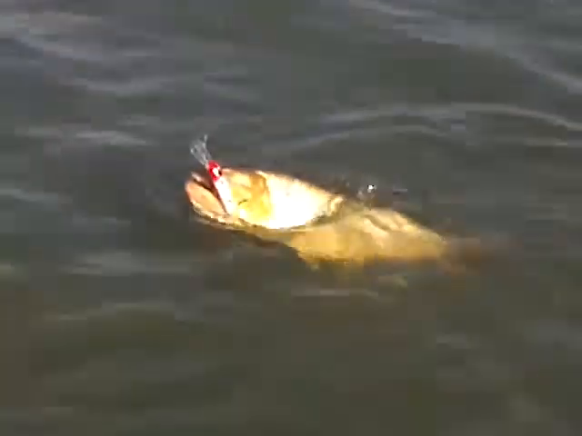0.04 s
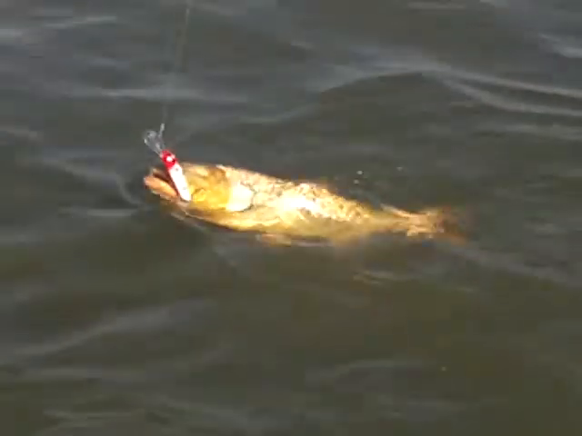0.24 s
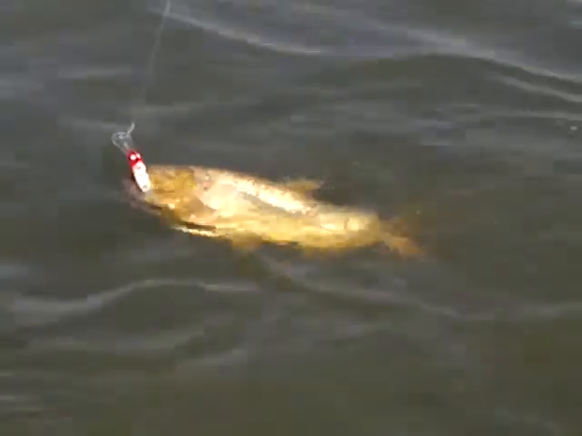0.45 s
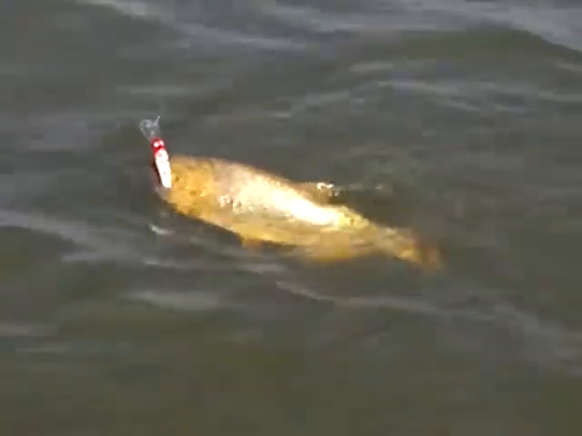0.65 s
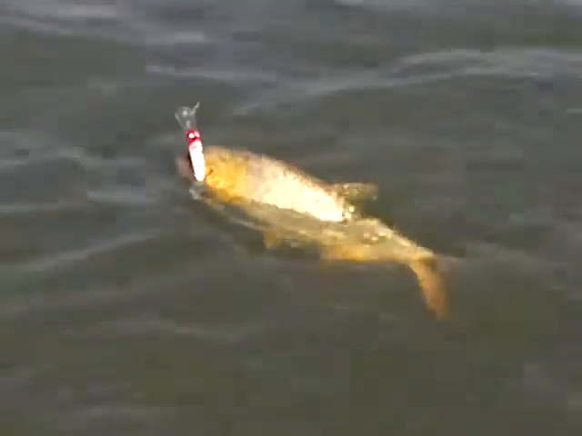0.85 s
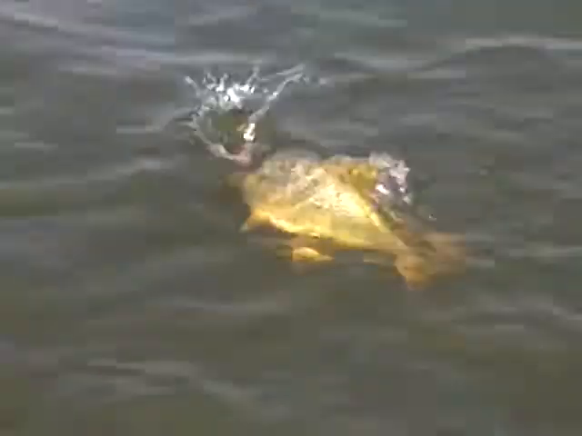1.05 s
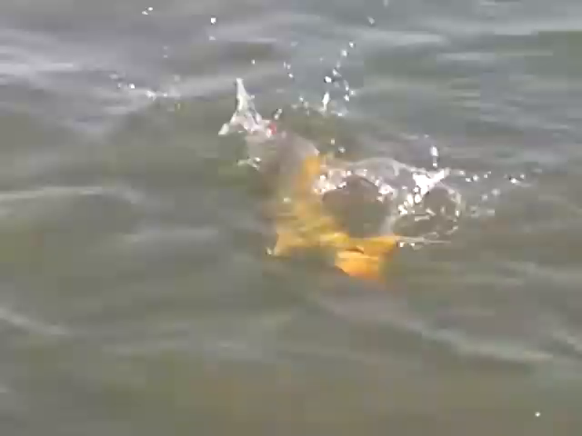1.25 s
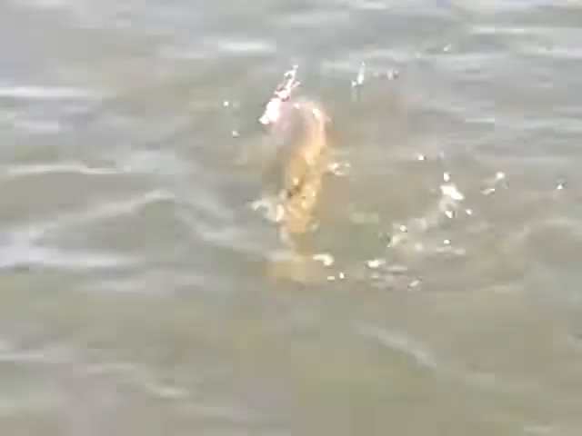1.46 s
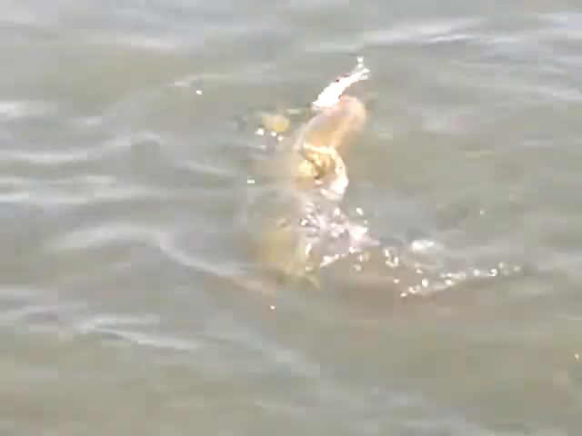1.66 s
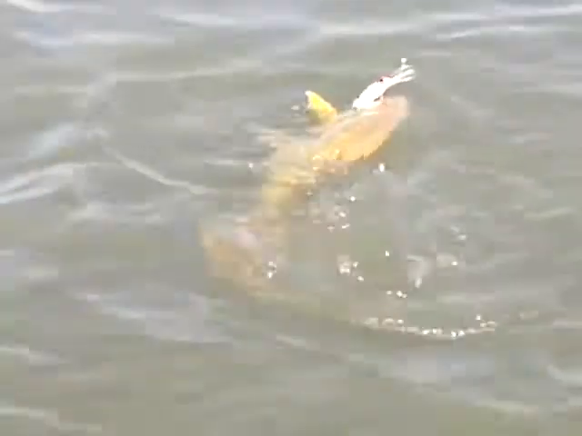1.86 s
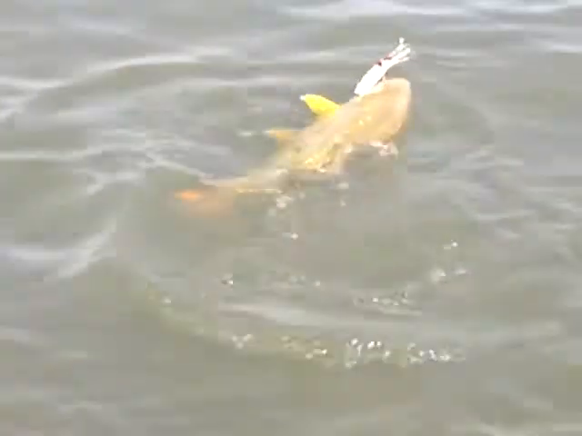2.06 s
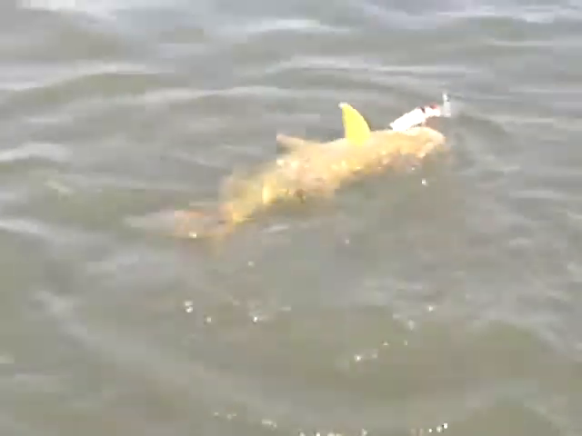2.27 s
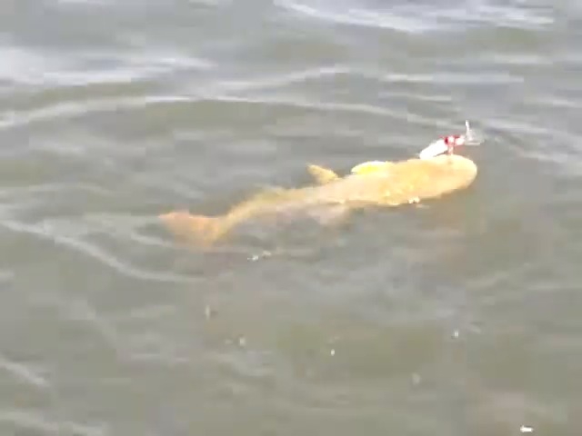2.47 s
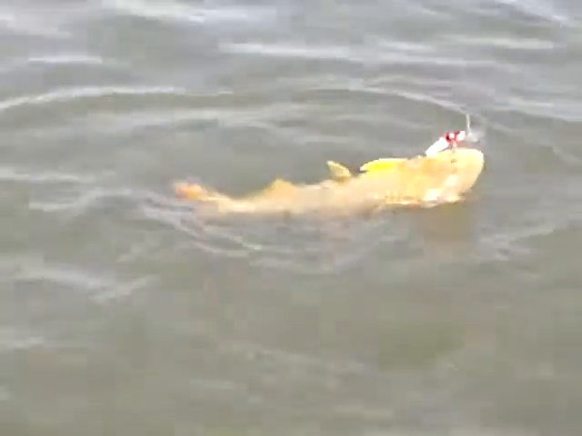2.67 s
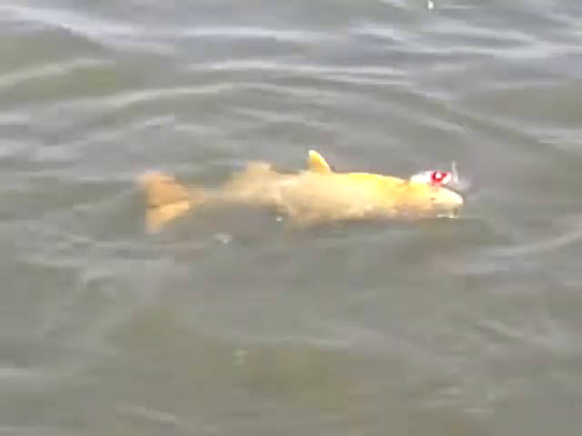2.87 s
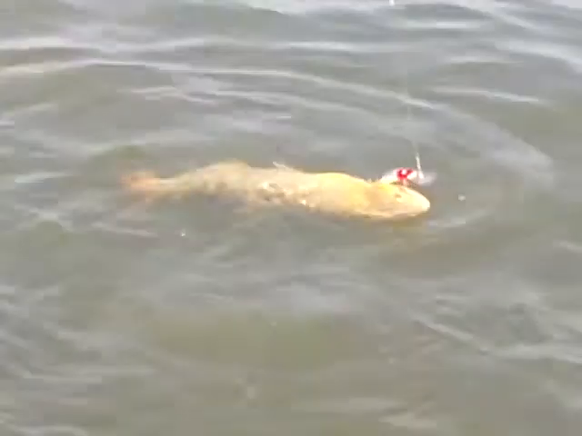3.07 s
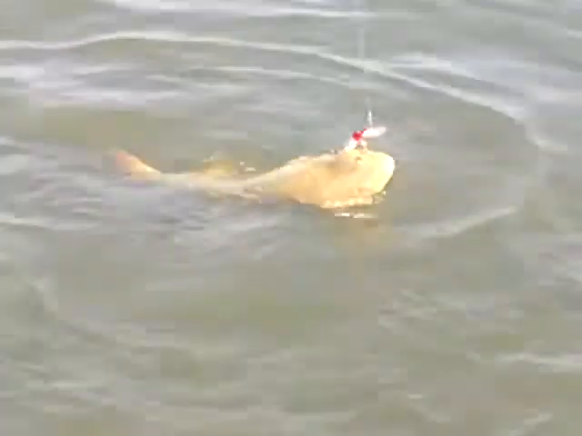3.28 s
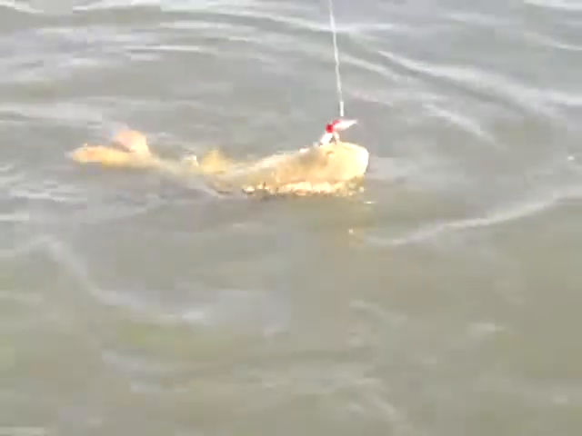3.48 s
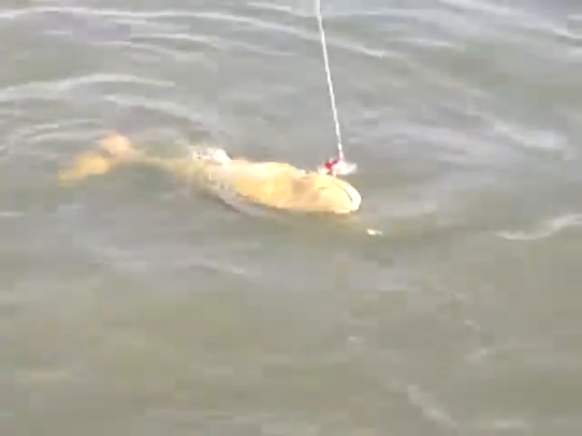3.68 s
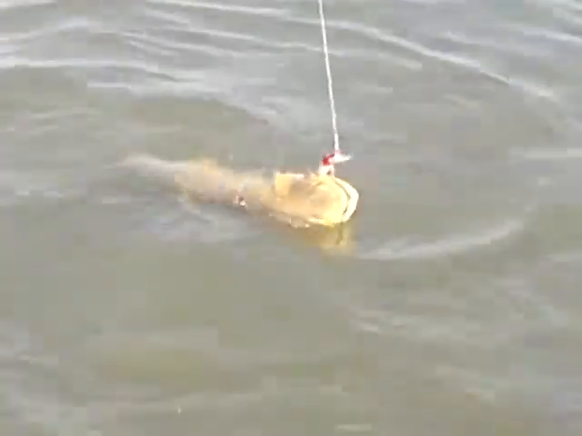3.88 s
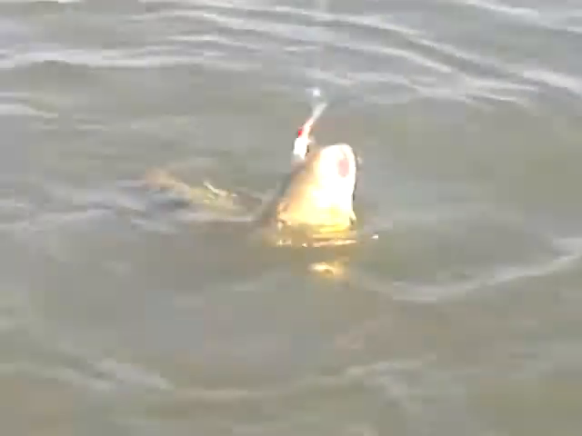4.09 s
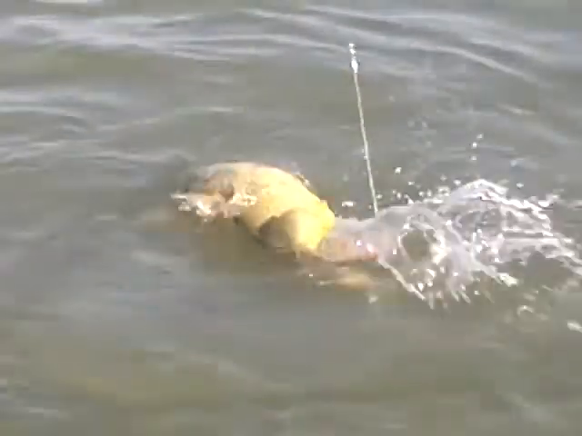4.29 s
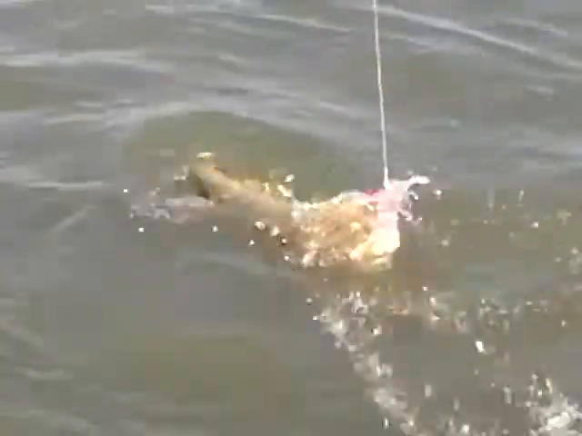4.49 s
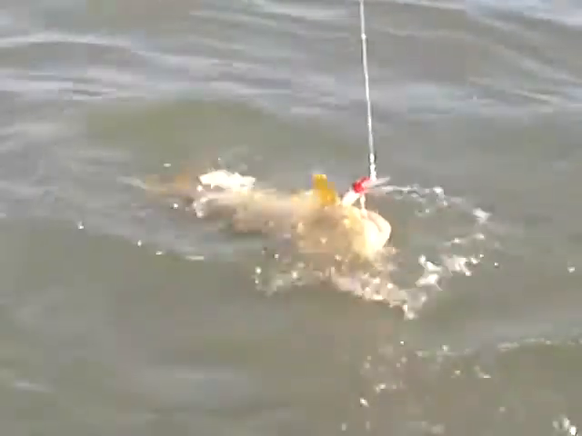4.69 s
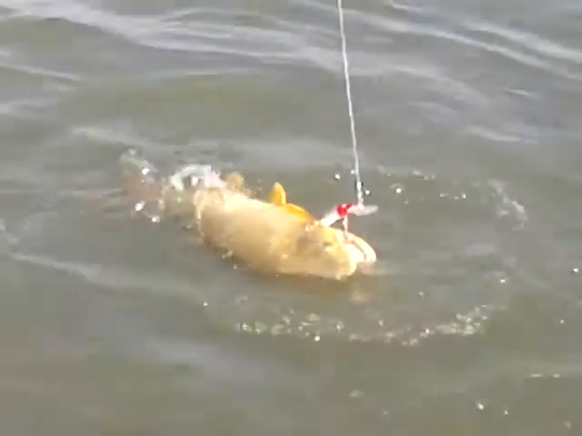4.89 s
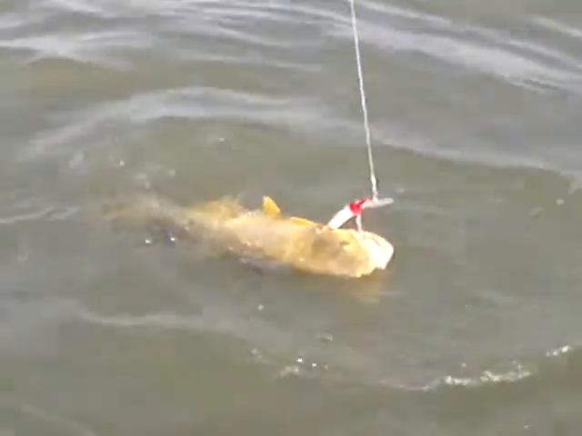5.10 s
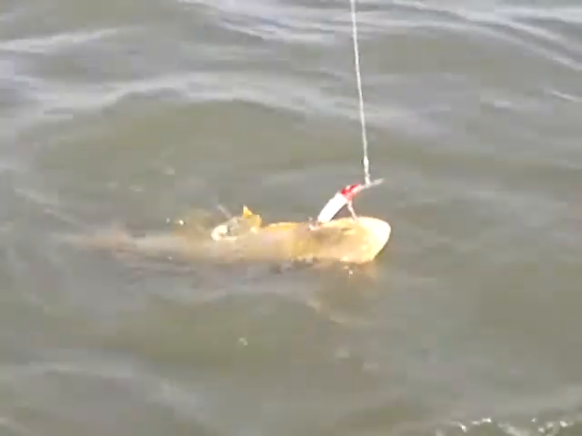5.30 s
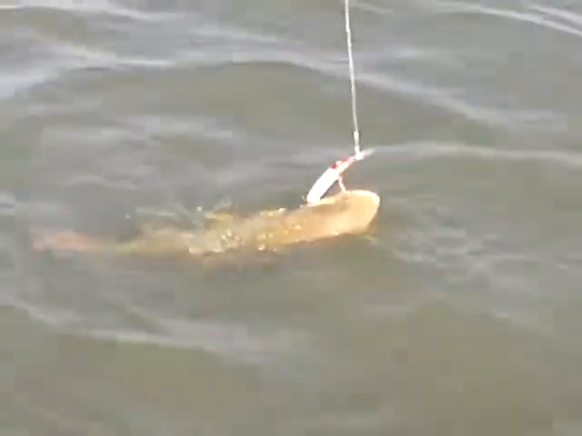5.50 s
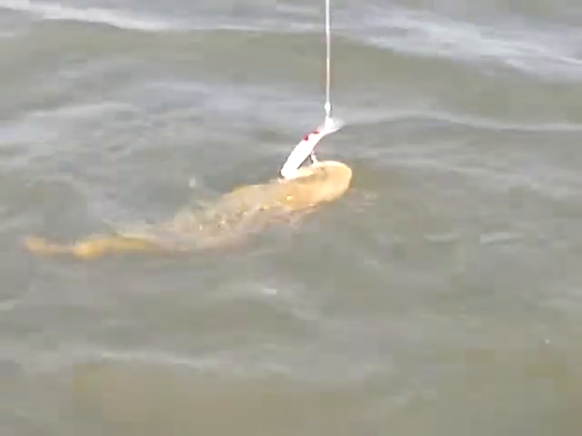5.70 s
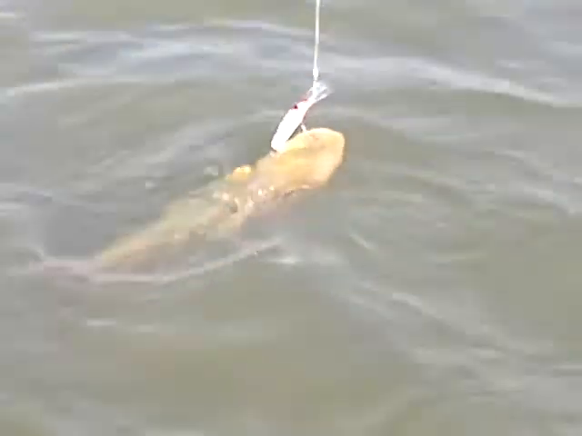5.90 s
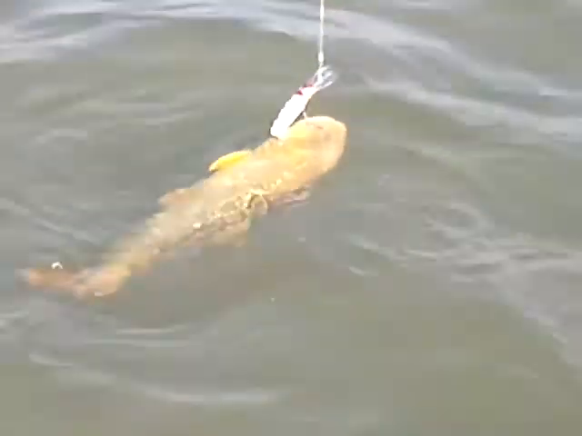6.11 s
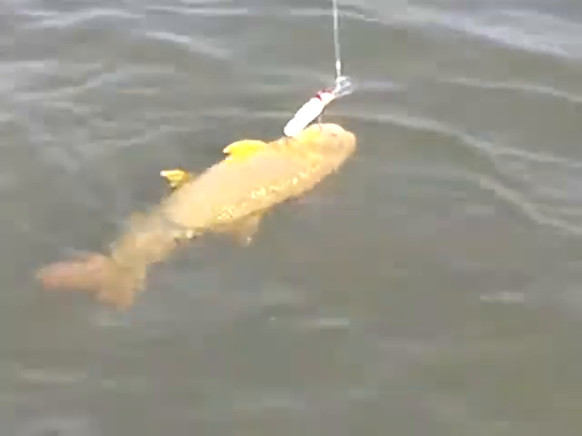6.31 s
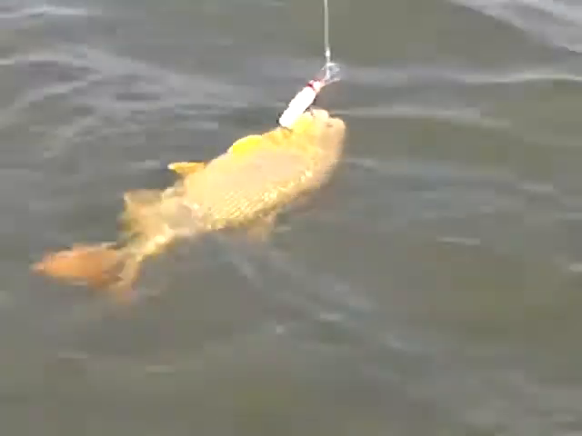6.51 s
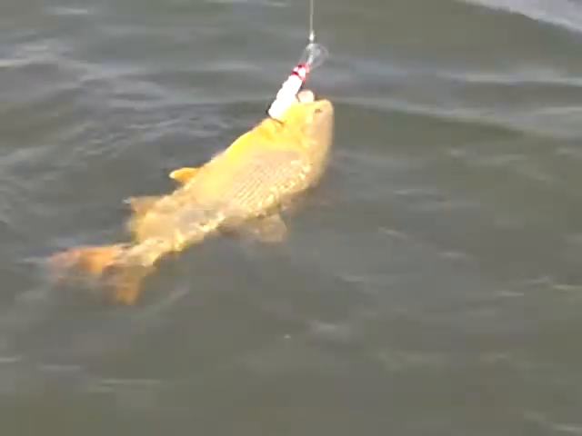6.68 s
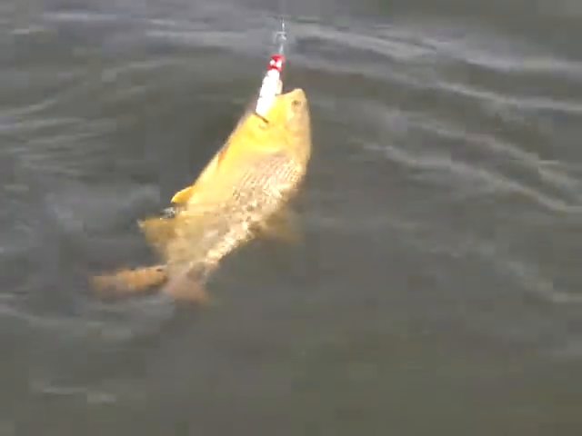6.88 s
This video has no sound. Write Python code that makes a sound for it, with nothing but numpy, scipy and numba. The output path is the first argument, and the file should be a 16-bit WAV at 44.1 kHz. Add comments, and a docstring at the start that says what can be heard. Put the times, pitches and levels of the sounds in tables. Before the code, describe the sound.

Outdoors on open water, close wind pounds the right side of a stereo microphone with deep, fluttering thumps; the left is sheltered. Under it lies a faint steady boat hum. Small drips come first, then a fish thrashes in a splash after one second. Sparse plops and gulps follow, then a harder wet flurry from four to five seconds, low gurgles, and two dull knocks on the camera near six.

```python
"""A hooked fish thrashes at the surface beside a small boat on a windy day, over steady hull hum and rumble.
From the start gusts pound the right microphone port, as band-passed noise and bell-shaped swings, rasp in its
capsule and brush the sheltered left one. Drops fall, then near 1 s water bursts up: shaped noise with dying
sines for bubbles. Sparser drops, gulps and lapping follow, a harder burst of spray and slaps fills 4 to 5 s,
then water gurgles low and near 6 s the camera body is knocked twice: pressure pulses with a short shell ring."""
import sys
import numpy as np
from scipy import signal
from scipy.fft import rfft, irfft, next_fast_len
from scipy.io import wavfile
from scipy.ndimage import uniform_filter1d
from numba import njit

SR = 44100
rng = np.random.default_rng(int(sys.argv[2]) if len(sys.argv) > 2 else 0)


def put_to_file(sound):
    """Save the sound as 16-bit audio at rate SR, in the file named by the first command-line argument."""
    columns = np.atleast_2d(sound).T  # one column per channel
    safe = np.clip(columns, -1, 1)
    whole_steps = np.round(safe * 32767)
    wavfile.write(sys.argv[1], SR, whole_steps.astype(np.int16))


N = 306406
PADDED = next_fast_len(N + 4096)   # transform length, samples
HZ = np.maximum(np.fft.rfftfreq(PADDED, 1 / SR), 1)


def splash():
    """Superposed impacts and bubble resonances: droplets make slosh, spray and mist, trapped air the churn."""
    # spectra of sloshing water, spray and fine mist: f/Hz, relative level/dB
    slosh_spectrum = [(700, -15.5), (1100, -8.5), (1450, 4.5), (1750, 6), (2000, 10.5), (2300, 6),
                      (2700, -3), (3200, -10), (4000, -28)]
    spray_spectrum = [(1600, -13), (2500, 5.5), (3100, 5), (3800, 5), (4800, 3.5), (7000, -19.5)]
    mist_spectrum = [(3200, -12.5), (4800, 9), (5800, 8), (7500, 8), (10500, 7.5), (13000, 3.5),
                     (16000, -3)]
    trickle_db, trickle_per_s = -86, 31   # stray droplets and lapping at the hull
    sloshing, spraying, misting, churning = sheets_and_lapping()

    droplets = rms_one(clicks(1500 * from_db(6.5 * drift(60)), spread_db=3.0))
    impacts = droplets + 0.6 * rng.standard_normal(N)
    low_bubbles = bubbles(1700, 1100, 3400, cycles=17.0, spread_db=3.5)
    high_bubbles = bubbles(1800, 2200, 5500, cycles=4.4, spread_db=7.0)
    slosh = patchy(impacts + 0.36 * low_bubbles, slosh_spectrum, patchy_db=3.0, rate=22)
    spray = patchy(impacts + 0.11 * high_bubbles, spray_spectrum, patchy_db=3.0, rate=30)
    mist = patchy(impacts, mist_spectrum, patchy_db=3.0, rate=45)
    churn = bubbles(400, 472, 1244, cycles=21.0, spread_db=2.0)
    trickle = bubbles(trickle_per_s, 1500, 12000, cycles=6.9, spread_db=2.0)

    # so many grains overlap that no single one stands far out
    slosh, spray, churn = (evened(layer, 0.014, share=0.16) for layer in (slosh, spray, churn))
    water = sloshing * slosh + spraying * spray + misting * mist
    return water + churning * churn + plips(sloshing) + from_db(trickle_db) * trickle


def sheets_and_lapping():
    """Exponential decay in two stages: each sheet or swell rises, dies and dribbles away over calm water."""
    # sheets of water thrown up, and small swells of lapping: t/s, hold/s, then slosh, spray, mist and
    # churn level/dB
    water_rows = [(0.407, 0.026, -60, -95, -72, -58), (0.946, 0.019, -51, -65, -93, -60),
                  (0.969, 0.02, -60, -56, -67, -62), (0.995, 0.033, -50, -49.5, -55, -54.5),
                  (1.037, 0.023, -43, -45.5, -61, -56), (1.096, 0.027, -50, -94, -73, -46),
                  (1.132, 0.021, -52, -82, -92, -59), (1.21, 0.055, -60, -72, -63, -57),
                  (1.263, 0.017, -36.5, -69, -57, -44), (1.283, 0.048, -48.5, -52, -55.5, -51),
                  (1.34, 0.116, -47.5, -62, -58, -55.5), (1.425, 0.01, -43, -62, -80, -50),
                  (1.46, 0.018, -44, -49, -58, -57.5), (1.489, 0.072, -53, -96, -98, -56),
                  (1.581, 0.05, -53.5, -98, -70.5, -55), (1.713, 0.0069, -57, -72, -72, -57),
                  (1.654, 0.055, -61, -92, -76, -56), (1.759, 0.05, -65, -78, -72.5, -52),
                  (2.029, 0.067, -54, -82, -70, -69), (2.384, 0.044, -60, -78.5, -78.5, -55),
                  (2.853, 0.06, -80, -78.5, -80, -61.5), (3.102, 0.0057, -54, -64, -69, -51),
                  (3.103, 0.017, -55, -53, -66.5, -47), (3.124, 0.015, -50.5, -53, -73, -45),
                  (3.017, 0.092, -71, -72, -80.5, -80), (3.272, 0.014, -71.5, -71.5, -82.5, -65),
                  (3.483, 0.041, -75, -102, -94, -61), (3.663, 0.035, -65, -97, -93.5, -58),
                  (4.009, 0.016, -63.5, -54, -55, -77), (4.073, 0.012, -60, -50, -54, -62),
                  (4.091, 0.02, -58, -40.5, -58, -67), (4.118, 0.0065, -53, -54, -55, -53),
                  (4.132, 0.018, -53, -48, -54, -60), (4.157, 0.044, -51, -43, -45, -43),
                  (4.2, 0.057, -45, -49.5, -67, -44), (4.262, 0.012, -44.5, -54, -60, -61),
                  (4.283, 0.043, -46.5, -51, -58.5, -50.5), (4.318, 0.079, -56, -52.5, -62, -75),
                  (4.396, 0.026, -57, -68, -57, -63), (4.419, 0.062, -54, -55.5, -55.5, -58),
                  (4.461, 0.026, -43.5, -55.5, -49, -75), (4.505, 0.026, -54, -53, -56.5, -58.5),
                  (4.54, 0.033, -50.5, -55, -63, -53.5), (4.582, 0.017, -53.5, -49, -53, -45.5),
                  (4.609, 0.032, -48, -44.5, -53, -58), (4.659, 0.048, -50.5, -74, -70, -65.5),
                  (4.72, 0.015, -48.5, -60, -74, -61.5), (4.766, 0.11, -59, -92, -76.5, -55.5),
                  (4.888, 0.048, -58.5, -78, -69, -59.5), (5.339, 0.086, -80, -79.5, -85, -57.5),
                  (5.75, 0.013, -78.5, -68, -85.5, -73), (6.347, 0.024, -75.5, -88.5, -86, -64.5),
                  (6.656, 0.014, -70, -80, -75, -67), (6.895, 0.015, -80, -80, -91, -80)]
    rise_db_per_s = 3199.5
    # first decay of slosh, spray, mist, churn: rate/(dB/s)
    falls_db_per_s = [600, 895, 786, 413]
    # water running back, same order: level against the sheet or swell/dB; decay rate/(dB/s)
    dribbles_db = [-25.5, -35, -19.5, -31]
    dribbles_db_per_s = [70, 90, 60, 60]
    # calm water, same order: level/dB
    calms_db = [-95.5, -96, -88.5, -70.5]

    s, hold, *levels = np.transpose(water_rows)
    settings = zip(levels, falls_db_per_s, dribbles_db, dribbles_db_per_s, calms_db)
    gains = []
    for level_db, fall, dribble_db, slow_fall, calm_db in settings:
        strike = swells(s, hold, level_db, rise_db_per_s, fall)
        dribble = swells(s + hold, 0 * s, level_db + dribble_db, rise_db_per_s, slow_fall)
        gains.append(strike + dribble + from_db(calm_db))
    return gains


def bubbles(per_s, low_hz, high_hz, cycles, spread_db):
    """Bubble resonance in a swarm: each impulse rings one of 14 pitches, down 60 dB in the given cycles; rms 1."""
    born = clicks(per_s, spread_db)
    dealt = rng.integers(0, 14, N)
    pitches = np.geomspace(low_hz, high_hz, 14)
    return rms_one(sum(ring(born * (dealt == k), hz, cycles / hz) for k, hz in enumerate(pitches)))


def plips(sloshing):
    """Resonance of small separate bubbles with climbing pitch; their strength follows the slosh at birth."""
    per_s, spread_db = 220, 3.5
    low_hz, high_hz, mean_cycles, most_climb = 972, 2500, 12, 0.2
    out = np.zeros(N)
    for when, pitch, size, length in rng.random((int(per_s * N / SR), 4)):
        hz = low_hz * (high_hz / low_hz) ** pitch
        gain = sloshing[int(when * N)] * from_db(-spread_db * np.log(size + 0.033))
        cycles = mean_cycles * (.5 + length)
        plip = bubble(hz, cycles, most_climb * length, onset=2.3, length_s=.03)
        add(out, when * N / SR, gain * plip)
    return out


def slaps():
    """Impact and damped cavity resonance: a broad crack centred on the pitch of a ring of only a few cycles."""
    # flat slaps of tail and flung water: t/s, level/dB before the band-pass, f/Hz
    slap_rows = [(1.06, -31, 4050), (1.1485, -37, 1850), (1.3148, -30, 3600), (1.3363, -34, 3000),
                 (1.3827, -34, 4500), (1.3982, -33, 2700), (1.4093, -35, 4500), (1.4294, -31, 1850),
                 (1.44, -35, 3400), (1.4553, -35, 4500), (1.5175, -42, 2600), (1.4632, -20, 2200),
                 (1.4722, -31, 4300), (1.4795, -34, 3550), (3.0969, -36, 2200), (4.0713, -38, 3600),
                 (4.0934, -21, 3200), (4.1253, -33, 4200), (4.1575, -26, 3600), (4.1726, -27, 2500),
                 (4.1838, -21, 3400), (4.2628, -24, 1750), (4.2792, -28, 2200), (4.3086, -35, 4800),
                 (4.327, -35, 5500), (4.3488, -32, 2400), (4.3762, -35, 4200), (4.4682, -25, 2300),
                 (4.4988, -32, 2800), (4.5046, -32, 3500), (4.5851, -30, 2000), (4.5915, -32, 2200),
                 (4.603, -33, 4100), (4.616, -35, 6500), (4.6393, -30, 3300), (4.7153, -37, 3600),
                 (4.9105, -38, 1500)]
    ring_cycles = 9.0   # to fall 60 dB
    crack_db, crack_ms = -1, 1.0   # against the ring; decay constant
    reach = 1.9   # a slap spans this factor either side of its pitch
    out, t = np.zeros(N), np.arange(400) / SR
    for (s, level_db, hz), grain in zip(slap_rows, rng.standard_normal((len(slap_rows), 400))):
        band = signal.butter(2, [hz / reach, hz * reach], "band", fs=SR, output="sos")
        crack = grain * np.exp(-t * 1000 / crack_ms)
        cavity = np.sin(2 * np.pi * hz * t) * from_db(-60 * hz * t / ring_cycles)
        add(out, s, from_db(level_db) * signal.sosfilt(band, cavity + from_db(crack_db) * crack))
    return out


def drops_and_gulps():
    """Impact and damped resonance: a drop cracks and leaves a ringing bubble; gulps and gurgles only ring."""
    # single drops: t/s, level/dB at full onset before decay, f/Hz
    drop_rows = [(0.105, -50, 2580), (0.209, -53, 2500), (0.359, -51, 2350), (0.415, -43, 1940),
                 (0.4474, -41, 1520), (0.563, -52.5, 1580), (0.733, -50.5, 2680), (0.946, -42, 1500),
                 (0.976, -35, 3600), (0.9783, -38, 1840), (0.989, -41.5, 930), (0.993, -39, 2020),
                 (1.004, -39, 1850), (1.0425, -31, 1800), (1.163, -41, 1900), (1.184, -49, 2800),
                 (0.991, -34, 3000), (1.013, -31, 3420), (1.033, -44, 1740), (1.047, -22, 2650),
                 (1.097, -33.5, 2160), (1.1393, -36, 1850), (1.235, -52, 1830), (1.263, -20, 2320),
                 (1.2684, -24, 1780), (1.273, -24, 1690), (1.281, -39, 1750), (1.3188, -27.5, 1860),
                 (1.342, -29, 2000), (1.424, -39, 1610), (1.4431, -31, 1850), (1.492, -45, 2120),
                 (1.521, -43.5, 1204), (1.543, -56, 2410), (1.559, -55, 2450), (1.585, -45, 2070),
                 (1.601, -37, 1870), (1.597, -34.5, 1500), (1.667, -40, 1840), (1.716, -40, 1900),
                 (1.756, -55, 3100), (1.783, -44, 1030), (1.814, -47, 1040), (1.821, -58, 1980),
                 (1.908, -43.5, 2780), (2.038, -45.5, 1890), (2.387, -41.5, 2570), (2.6904, -48, 2470),
                 (3.234, -62, 3000), (3.2596, -50, 4170), (3.262, -52, 2500), (3.277, -54, 2010),
                 (3.504, -58, 2220), (3.583, -53.5, 5460), (4.0005, -48, 3660), (4.0168, -32, 3630),
                 (4.077, -35, 3700), (4.083, -37, 3880), (4.1, -32, 3360), (4.113, -41, 1990),
                 (4.193, -33, 2040), (4.2295, -32, 3440), (4.235, -37, 2150), (4.2635, -29.5, 1730),
                 (4.329, -30, 1930), (4.414, -38, 1800), (4.483, -38, 4800), (4.524, -38, 1950),
                 (4.534, -35, 1105), (4.619, -35, 5600), (4.611, -42, 2800), (4.61, -44.5, 1200),
                 (4.378, -41, 1380), (4.466, -32.5, 1320), (4.479, -30, 1655), (4.497, -33, 2170),
                 (4.542, -30.5, 2500), (4.544, -37.5, 980), (4.614, -36, 1960), (4.624, -34, 2480),
                 (4.6595, -34, 1920), (4.673, -43, 1380), (4.711, -39, 2000), (4.72, -51, 2200),
                 (4.739, -48, 1440), (4.785, -50, 2860), (4.899, -42, 2240), (4.919, -47, 2240),
                 (4.907, -39, 1360), (4.91, -46.5, 5400), (5.014, -56, 2100), (5.171, -53, 6200),
                 (5.255, -51, 3350), (5.437, -56.5, 5520), (5.55, -59, 4180), (5.648, -55, 2250),
                 (5.725, -53, 2230), (5.754, -50, 4570), (5.937, -51.5, 2000), (6.355, -57, 2220),
                 (6.585, -58, 2950), (6.657, -49, 1720), (6.75, -56.5, 3080)]
    # big gulps, and low gurgles of water against the hull: t/s, level/dB as above, f/Hz, cycles to fall 30 dB,
    # climb of pitch
    gulp_rows = [(0.72, -56, 558, 8.3, 0.16), (1.032, -39, 504, 19, .05), (1.048, -39, 467, 28, 0.51),
                 (1.0985, -29.5, 508, 13, 0.51), (1.118, -56, 550, 16, 0.26), (1.192, -62, 463, 8.7, .13),
                 (1.263, -37, 735, 23, .1), (1.478, -35.5, 583, 16, 0.088), (2.011, -39.5, 352, 19, 0.12),
                 (2.76, -41, 760, 15, 0.15), (2.856, -22, 487, 5.7, 0.1), (2.869, -42.5, 850, 15, 0.055),
                 (2.951, -39, 923, 21, .05), (3.11, -28, 480, 6.5, .1), (4.0925, -30, 655, 21, .02),
                 (4.154, -25.5, 598, 16, 0.075), (4.167, -32, 614, 21, .02), (4.2035, -23, 710, 4.5, .02),
                 (4.21, -26, 550, 10, 0.018), (4.219, -32, 650, 6.5, .02), (4.229, -40, 560, 8.7, .05),
                 (4.245, -33, 520, 12, 0.17), (4.458, -38.5, 503, 9.1, .13), (4.548, -34.5, 502, 16, .02),
                 (4.56, -32.5, 442, 15, 0.11), (5.345, -25.5, 284, 7.3, 0.14), (5.755, -34, 460, 8.7, .13),
                 (6.126, -30, 237, 14.3, 0.077), (6.255, -32, 534, 6.7, .13), (6.659, -27.5, 271, 18, 0.17)]
    drop_cycles, crack_db = 25, -28   # cycles to fall 30 dB; crack against the ring
    out = np.zeros(N)
    crack_fade = np.exp(-np.arange(400) / 22)
    cracks = rng.standard_normal((len(drop_rows), 400)) * crack_fade
    for (s, level_db, hz), crack in zip(drop_rows, cracks):
        add(out, s, from_db(level_db) * bubble(hz, drop_cycles, rise=0.018, onset=2.2))
        add(out, s, from_db(level_db + crack_db) * np.diff(crack))
    for s, level_db, hz, cycles, climb in gulp_rows:
        add(out, s, from_db(level_db) * bubble(hz, cycles, climb, onset=2.0))
    return out


def bubble(hz, cycles, rise, onset, length_s=.1):
    """Damped resonance: a dying sine whose pitch climbs, like that of a bubble nearing the surface."""
    turns = np.arange(int(length_s * SR)) / SR * hz
    life = np.minimum(turns / max(cycles, 1), 4)   # 30 dB of decay each
    tone = np.sin(2 * np.pi * turns * (1 + rise * life))
    return tone * from_db(-30 * life) * np.minimum(turns / onset, 1)


def specks():
    """Impulsive excitation: specks of spray land as very short bright noise, each with its own grain."""
    # dry ticks: t/s, level/dB before the band-pass
    speck_rows = [(0.388, -54), (0.4229, -55), (0.7033, -56), (0.9068, -42), (1.1483, -64), (1.1957, -47),
                  (1.2353, -42), (1.3663, -47), (1.5194, -60), (1.789, -49), (1.9075, -41), (1.9487, -54),
                  (2.038, -46.5), (2.354, -50.5), (2.5706, -52), (3.2614, -47), (3.5828, -59),
                  (3.7095, -56.5), (4.875, -58), (4.925, -48), (5.1711, -49), (5.2426, -50.5), (5.397, -57),
                  (5.4744, -64), (5.509, -56), (5.538, -57), (5.604, -57), (5.6496, -52), (6.2677, -56.5),
                  (6.6573, -53), (6.6894, -64), (6.7211, -59), (6.752, -55), (6.879, -62)]
    low_hz, top_hz, decay_ms = 2800, 11000, 1
    out, fade = np.zeros(N), np.exp(-np.arange(300) / (decay_ms * SR / 1000))
    for (s, level_db), grain in zip(speck_rows, rng.standard_normal((len(speck_rows), 300))):
        add(out, s, from_db(level_db) * grain * fade)
    return signal.sosfilt(signal.butter(3, [low_hz, top_hz], "band", fs=SR, output="sos"), out)


def ports(x):
    """Diffraction and reflection: the camera body shades and delays the right port; shifting glints reach it."""
    # right port against left for sound from the water: f/Hz, level/dB, phase lag/rad
    shadow = [(50, 5, 0), (400, 7, 0), (950, 4.5, .2), (1300, 2.5, .9), (1550, 0, 2.3), (1800, -1, 2.0),
              (2100, -1.5, 3.0), (2800, -9, 3.8), (3300, -9, 6.0), (4200, -7, 7.4), (6500, -10, 15),
              (8000, -16, 17), (11000, -22, 22), (16000, -18, 32)]
    # glints off moving wavelets that reach the right port alone, ahead of its shading: f/Hz, level/dB
    glint_spectrum = [(20, -30), (300, -13), (1000, -7), (2000, -2), (4000, 0), (8000, 5), (14000, 14),
                      (22050, 14)]
    hz, level_db, lag = np.transpose(shadow)
    shade = from_db(np.interp(np.log(HZ), np.log(hz), level_db))
    late_turn = np.exp(-1j * np.interp(HZ, hz, lag))
    glints = np.zeros(N)
    for part in bands(colour(x, glint_spectrum), 200, 16000):
        # the sine of a drift wanders in sign at a steady mean strength
        glints += part * np.sqrt(2) * np.sin(3 * drift(45))
    right = irfft(rfft(x + glints, PADDED) * late_turn * shade, PADDED)[:N]
    return np.array([x, right])


def winds():
    """Turbulent pressure at both ports: gusts over a breeze; at the right the pitch glides from gust to gust."""
    # exposed right port: t/s, hold/s, eddy level/dB, flutter level/dB, eddy f/Hz
    gusts_right = [(0.009, 0.15, -19, -35.5, 66.8), (0.155, 0.0044, -42, -38, 61.8),
                   (0.305, 0.11, -26.5, -42, 53.3), (0.363, 0.11, -23.5, -34, 67.1),
                   (0.437, 0.032, -33, -56, 50.2), (0.619, 0.069, -23, -35, 57.2),
                   (0.692, 0.011, -15, -36, 52.5), (0.794, 0.13, -31.5, -46, 41.4),
                   (0.832, 0.14, -14.5, -36.5, 47), (1.098, 0.025, -30.5, -47, 52.5),
                   (1.266, 0.043, -11, -29, 50.2), (1.409, 0.062, -21, -37.5, 38.1),
                   (1.576, 0.11, -19, -64, 45.4), (1.854, 0.013, -59, -67, 45),
                   (1.969, 0.028, -23, -36, 40.8), (2.058, 0.11, -21.5, -41, 41.5),
                   (2.205, 0.082, -51, -58, 40.7), (2.449, 0.023, -9.5, -26, 47.9),
                   (2.533, 0.007, -21, -52, 48.7), (2.677, 0.044, -30, -41, 41.4),
                   (2.897, 0.047, -11.5, -29.5, 55.4), (3.021, 0.066, -17.5, -22, 39.7),
                   (3.114, 0.047, -25, -39, 47.5), (3.3, 0.014, -13.5, -39, 50.3),
                   (3.47, 0.017, -21, -38, 48.9), (3.553, 0.047, -33, -36, 44.8),
                   (3.657, 0.3, -20, -35.5, 52), (3.885, 0.0091, -16.5, -20, 58),
                   (3.941, 0.0047, -25, -24, 61.1), (4.031, 0.06, -19.5, -27, 61.8),
                   (4.106, 0.025, -18, -50, 46.1), (4.217, 0.016, -15, -54, 81.6),
                   (4.27, 0.037, -22.5, -60, 54.8), (4.384, 0.0099, -19.5, -25, 60.0),
                   (4.455, 0.027, -18.5, -21, 69.5), (4.556, 0.031, -18, -33, 45.0),
                   (4.642, 0.031, -18, -59, 39.2), (4.752, 0.12, -18, -38, 60.0),
                   (4.93, 0.018, -24, -38.5, 52.9), (5.089, 0.015, -23, -41, 53.6),
                   (5.208, 0.058, -38.5, -49.5, 47), (5.362, 0.11, -17.5, -29.5, 60),
                   (5.471, 0.014, -19, -43, 60.0), (5.538, 0.068, -27, -33.5, 42.2),
                   (5.786, 0.041, -21.5, -34, 45), (5.862, 0.012, -37, -30, 76.2),
                   (5.92, 0.018, -12.5, -23, 61.5), (6.027, 0.068, -17.5, -30, 68.4),
                   (6.14, 0.13, -33, -40, 60), (6.276, 0.16, -18.5, -30, 81.5),
                   (6.479, 0.052, -23.5, -46, 60), (6.58, 0.12, -24.5, -34, 70.0),
                   (6.765, 0.32, -23, -37, 56.9), (6.93, 0.26, -10.5, -20, 62.7)]
    # sheltered left port: t/s, hold/s, eddy level/dB, flutter level/dB
    gusts_left = [(0.01, 0.18, -74, -44), (0.319, 0.075, -36, -50), (0.479, 0.043, -35.5, -56),
                  (0.748, 0.085, -34.5, -48), (0.913, 0.06, -33, -46), (1.252, 0.082, -35, -46),
                  (1.606, 0.02, -36, -54), (1.846, 0.024, -44, -51), (1.926, 0.029, -50, -50),
                  (2.45, 0.14, -41, -51.5), (2.614, 0.033, -31, -46), (2.859, 0.036, -32, -44.5),
                  (3.068, 0.048, -41, -33), (3.587, 0.018, -33, -46), (3.74, 0.048, -41, -51),
                  (3.821, 0.032, -33, -32), (3.9, 0.045, -33, -42), (4.2, 0.099, -58, -50),
                  (4.405, 0.044, -34, -45), (4.639, 0.065, -47, -50), (4.914, 0.052, -36, -68),
                  (5, 0.041, -52, -54), (5.33, 0.12, -30.5, -42), (5.493, 0.094, -36.5, -47),
                  (5.81, 0.017, -26, -51.5), (6.1, 0.05, -51, -44), (6.311, 0.032, -43, -46),
                  (6.66, 0.09, -39, -44), (6.745, 0.019, -36, -44)]
    # mean eddies of the breeze between gusts, right port: t/s, level/dB
    breeze = [(0, -35.5), (1.3, -35), (1.75, -33), (1.81, -59), (1.93, -66), (2.1, -45), (2.8, -39.5),
              (3.3, -46.5), (3.39, -53), (3.44, -54), (3.6, -29.5), (4.8, -54), (5.05, -39.5), (5.6, -46),
              (5.7, -40.5), (5.9, -33), (6.95, -38)]
    flutter_hz, left_eddy_hz, left_flutter_hz = 146.8, 45, 200
    breeze_flutter_db, lumps_db = -15.5, 1.5   # flutter against eddies; chance swell
    left_calm_db, left_calm_flutter_db = -62.5, -74   # mean level of still air

    still = np.ones(N)
    pitch_hz, = in_time([(s + hold / 2, hz) for s, hold, eddy_db, flutter_db, hz in gusts_right])
    breeze_db = in_time(breeze)[0] + lumps_db * drift(4.2)
    stir_db = lumps_db * drift(3.1)
    sheltered = wind(gusts_left, left_eddy_hz * still, left_flutter_hz * still,
                     left_calm_db + 2 * stir_db, left_calm_flutter_db + stir_db,
                     damping=0.86, flutter_damping=0.57, lumpy_db=14.0, heave_db=2, top_hz=420)
    exposed = wind(gusts_right, pitch_hz, flutter_hz * still, breeze_db, breeze_db + breeze_flutter_db,
                   damping=0.75, flutter_damping=0.6, lumpy_db=9.5, heave_db=0.5, top_hz=340)
    return np.array([sheltered, rasping(exposed + buffets())])


def wind(gusts, eddy_hz, flutter_hz, calm_db, calm_flutter_db,
         damping, flutter_damping, lumpy_db, heave_db, top_hz):
    """Eddy pressure: slow swings roll past the port over a deeper heave; smaller eddies flutter on top."""
    rise_db_per_s, fall_db_per_s = 450.5, 338
    s, hold, eddy_db, flutter_db = np.transpose(gusts)[:4]
    eddy_swell = swells(s, hold, eddy_db, rise_db_per_s, fall_db_per_s)
    flutter_swell = swells(s, hold, flutter_db, rise_db_per_s, fall_db_per_s)
    eddy_gain = np.hypot(eddy_swell, from_db(calm_db))
    flutter_gain = np.hypot(flutter_swell, from_db(calm_flutter_db))

    heave = rms_one(rolling(0.546 * eddy_hz, damping))
    eddies = rms_one(rolling(eddy_hz, damping)) + from_db(heave_db) * heave
    lumps = from_db(lumpy_db * np.clip(drift(48), -3, 1.3))
    flutter = evened(rolling(flutter_hz, flutter_damping), 0.04, share=0.56) * lumps
    swings = eddy_gain * evened(eddies, 0.06, share=0.65) + flutter_gain * rms_one(flutter)
    # no eddy is smaller than the port
    return signal.sosfilt(signal.butter(4, top_hz, fs=SR, output="sos"), swings)


def buffets():
    """Transient eddy pressure: one strong eddy strikes as a brief oscillation under a bell-shaped swell."""
    # hard buffets on the right port: t/s of the crest, swell level/dB, f/Hz
    buffet_rows = [(0.16, -10.5, 65), (0.394, -7, 74.4), (0.721, -5.5, 57), (0.93, -9, 51.6),
                   (1.27, -0.5, 70), (1.312, -14, 51), (2.305, -20.5, 38.6), (2.47, -4, 65),
                   (2.852, -9.5, 60), (2.886, -4.5, 77.6), (2.918, -29.5, 52.4), (2.957, -2, 107.6),
                   (3.036, -12.5, 113), (3.059, -36, 90), (3.084, -12, 54.7), (3.292, -6, 49.7),
                   (3.323, -7.5, 90), (3.481, -11, 60), (3.501, -9, 55.4), (3.682, -11, 60),
                   (3.713, -10, 50.4), (3.732, -9.5, 83), (3.771, -7.5, 105), (3.811, -15, 70),
                   (3.901, -4.5, 58.6), (3.957, -10.5, 83.5), (4.032, -12, 101), (4.052, -12, 73),
                   (4.135, -10.5, 50.7), (4.233, -1, 95), (4.259, -22, 56.5), (4.39, -10, 89),
                   (4.417, -6, 61), (4.497, -6.5, 72), (4.542, -10.5, 128), (4.695, -10.5, 47.4),
                   (4.779, -13, 66.6), (4.804, -4.5, 66.7), (4.87, -10.5, 63), (5.36, -10, 78),
                   (5.376, -15, 58.3), (5.417, -15, 55.5), (5.448, -11, 77), (5.482, -1, 64.6),
                   (5.874, -6.5, 93), (5.928, -1.5, 89.6), (6.031, -9.5, 73.6), (6.062, -14, 66.6),
                   (6.086, -13, 59), (6.292, -11, 66.6), (6.352, -5.5, 84.6), (6.381, -4, 121.6),
                   (6.4, -7.5, 84), (6.434, -8.5, 89.7), (6.65, -9.5, 76), (6.879, -4, 77),
                   (6.932, -6.5, 88)]
    width_cycles = 0.64   # width of the swell at half height
    out, t = np.zeros(N), np.arange(-.06 * SR, .06 * SR) / SR
    for (s, level_db, hz), start in zip(buffet_rows, rng.random((len(buffet_rows), 1))):
        swell = .5 ** ((2 * hz * t / width_cycles) ** 2)
        add(out, s + t[0], from_db(level_db) * swell * np.sin(2 * np.pi * (hz * t + start)))
    return out


def rasping(swings):
    """Nonlinear capsule noise: a bright rasp grows with the smoothed square of the pressure."""
    # rasp spectrum: f/Hz, relative level/dB
    rasp_spectrum = [(600, 9.5), (1200, 15), (2500, 5), (5000, -0.5), (10000, -10.5), (15000, -20)]
    rasp_db = -53   # where the smoothed square reaches 0.44
    strain = uniform_filter1d(swings ** 2, size=200)
    rasp = rms_one(colour(rng.standard_normal(N), rasp_spectrum))
    return swings + from_db(rasp_db) * strain / 0.44 * rasp


def rolling(hz, damping):
    """Resonant filtering: noise passes twice through a band-pass that follows a pitch curve."""
    turn = 2 * np.pi * hz / SR
    once = moving_band(rng.standard_normal(N), turn, damping)
    return moving_band(once * np.sqrt(turn), turn, damping)


def handling():
    """Impulse response of the body: a knock is a pressure pulse, a slow rebound and a short ring of the shell."""
    # knocks on the camera body: t/s, left and right pulse level/dB ahead of the rebound, pulse time scale/ms,
    # signed scale of the pulse, left shell peak level/dB, shell tilt/(dB per octave)
    knocks = [(5.8140, -11.5, -5.5, 1.56, 1, -25, 3), (6.0430, -6.5, -1, 1.25, -0.86, -20.5, 6.5)]
    # shell modes: f/Hz, relative level/dB before tilt, 60 dB decay time/s
    shell_modes = [(1350, 27, 0.005), (2350, 2, 0.005), (3250, 0, 0.003), (4250, 4, 0.005),
                   (5200, 4, 0.003), (5950, 0, 0.003), (7450, -10, 0.005), (8500, -2, 0.003),
                   (9500, -2, 0.004)]
    # the right capsule jumps at the crest of hard gusts: t/s, peak level/dB
    ticks = [(2.4713, -15.5), (3.9019, -17.5), (5.931, -29)]
    shell_top_hz = 10500   # a fingertip excites nothing higher
    out, t = np.zeros((2, N)), np.arange(int(.03 * SR)) / SR
    for s, left_db, right_db, ms, sign, ring_db, tilt_db in knocks:
        push = np.exp(-(3.0 * (t * 1000 / ms - .75)) ** 2)
        rebound = signal.lfilter([.009], [1, -.993], push)
        strike = 1. * (np.arange(len(t)) == np.argmax(push))
        shell = np.zeros(len(t))
        for hz, mode_db, t60 in shell_modes:
            tilted_db = mode_db + tilt_db * np.log2(hz / shell_modes[2][0])
            shell += from_db(tilted_db) * ring(strike, hz, t60)
        shell = signal.sosfilt(signal.butter(6, shell_top_hz, fs=SR, output="sos"), shell)
        add(out, s, sign * (push - rebound) * from_db([[left_db], [right_db]]))
        add(out, s, shell / np.abs(shell).max() * from_db([[ring_db], [ring_db - 10.0]]))
    tick = signal.sosfilt(signal.cheby2(6, 40, 4200, fs=SR, output="sos"), np.exp(-t / .0006))
    for s, level_db in ticks:
        add(out[1], s, from_db(level_db) * tick / np.abs(tick).max())
    return out


def machinery():
    """Forced vibration through the hull: broad rumble, and wavering tones that are louder at the right port."""
    # level of the rumble, which also scales the hum: t/s, level/dB
    rumble_level = [(0.0, -47.5), (0.33, -53), (0.52, -48.5), (0.9, -49), (1.2, -53), (1.7, -49),
                    (1.88, -52), (2.05, -46.5), (2.32, -47), (2.65, -50), (2.9, -48), (3.4, -52),
                    (3.7, -48.5), (4.25, -50), (4.49, -53), (4.68, -49), (5.05, -55.5), (5.4, -46.5),
                    (5.7, -52), (5.9, -47.5), (6.1, -51.5), (6.56, -51), (6.85, -50), (6.95, -53)]
    # rumble spectrum: f/Hz, relative level/dB
    rumble_spectrum = [(60, 2), (110, 2), (200, -10), (300, -3.5), (410, -11.5), (520, -3.5), (680, -6.5),
                       (760, -15.5), (950, -12.5), (1200, -23), (1450, -27), (1800, -35.5), (2400, -43),
                       (4000, -63)]
    # steady tones, mean amplitude against the rumble: f/Hz, left level/dB, right level/dB
    hum_tones = [(119.8, -4.5, 5.5), (155, -5, 5), (158.7, -13.5, 1), (232, -9, 0), (301, -21, -5),
                 (347, -11.5, -1.5), (461.5, -11, -2), (514, -16, -2), (666, -31, -6), (714, -21, -9)]
    # a band of whirr at the right port alone: f/Hz, relative level/dB
    whirr_spectrum = [(700, -17), (900, 0), (1100, 4), (1300, -5.5), (1420, -14.5), (1600, -15),
                      (2300, -17), (3000, -23.5)]
    whirr_db = -13.5   # against the rumble
    level = from_db(in_time(rumble_level)[0])
    t, hum = np.arange(N) / SR, np.zeros((2, N))
    for hz, left_db, right_db in hum_tones:
        waver = np.cumsum(2.658 * drift(5.05)) / SR   # phase in turns, from a pitch drift in Hz
        tone = np.sin(2 * np.pi * (hz * t + waver + rng.random())) * from_db(2.0 * drift(7.0))
        hum += from_db([[left_db], [right_db]]) * tone
    hum[1] += from_db(whirr_db) * patchy(rng.standard_normal(N), whirr_spectrum, patchy_db=2.0, rate=9.8)
    rumble = patchy(rng.standard_normal(N), rumble_spectrum, patchy_db=4.0, rate=7.3)
    return level * rumble, level * hum


def patchy(source, spectrum, patchy_db, rate):
    """Band-wise modulation: each band flickers partly alone, partly with the rest; rms 1."""
    together = drift(rate * 0.19)
    mix = np.zeros(N)
    for part in bands(colour(source, spectrum), spectrum[0][0], spectrum[-1][0]):
        mix += part * from_db(patchy_db * (.5 * together + drift(rate)))
    return rms_one(mix)


def swells(starts, holds, levels_db, rise_db_per_s, fall_db_per_s):
    """Power summation of events that rise up to their start, hold and fall; worked out every 32nd sample."""
    t = np.arange(0, N + 32, 32) / SR
    early = starts[:, None] - t
    late = t - (starts + holds)[:, None]
    down_db = rise_db_per_s * np.maximum(early, 0) + fall_db_per_s * np.maximum(late, 0)
    event_db = levels_db[:, None] - np.minimum(down_db, 200)
    power = np.sum(from_db(2 * event_db), axis=0)
    return np.interp(np.arange(N) / SR, t, np.sqrt(power))


def clicks(per_s, spread_db):
    """Poisson-like impulses: random impacts, few of them large."""
    sizes = from_db(spread_db * np.minimum(rng.exponential(1, N), 5)) * rng.choice([-1, 1], N)
    return sizes * (rng.random(N) < per_s / SR)


def ring(x, hz, t60):
    """Damped resonator: a unit click sets a sine of initial height 1 ringing, down 60 dB after t60 seconds."""
    r, w = from_db(-60 / (t60 * SR)), 2 * np.pi * hz / SR
    return signal.lfilter([0, np.sin(w)], [1, -2 * r * np.cos(w), r * r], x + 1e-18)


@njit
def moving_band(x, turn, damping):
    """State-variable resonance: a band-pass whose centre follows turn (radians a sample)."""
    out, low, band = np.empty_like(x), 0., 0.
    for i in range(len(x)):
        low += turn[i] * band
        band += turn[i] * (x[i] - low - damping * band)
        out[i] = band / np.sqrt(turn[i])
    return out


def bands(x, low_hz, high_hz):
    """Spectral decomposition: overlapping half-octave bands that sum to the whole between the end centres."""
    spec = rfft(x, PADDED)
    for hz in low_hz * 2 ** np.arange(0, np.log2(high_hz / low_hz) + .5, .5):
        octaves_off = np.clip(np.log2(HZ / hz), -.5, .5)
        yield irfft(spec * np.cos(np.pi * octaves_off) ** 2, PADDED)[:N]


def colour(x, points):
    """Linear filtering: shape a signal by a spectrum of f/Hz, level/dB, silent outside its ends."""
    hz, level_db = np.transpose(points)
    gain = from_db(np.interp(np.log(HZ), np.log(hz), level_db, -200, -200))
    return irfft(rfft(x, PADDED) * gain, PADDED)[:N]


def drift(rate):
    """Low-pass random process: slow chance of rms 1, changing at about rate Hz, worked every 40th sample."""
    r = np.exp(-80 * np.pi * rate / SR)
    slow = signal.lfilter([1], [1, -2 * r, r * r], rng.standard_normal(N // 40 + 2002))[2000:]
    return np.interp(np.arange(N) / 40, np.arange(len(slow)), rms_one(slow))


def evened(x, window_s, share):
    """Envelope compression: take out a share of the chance swell of narrow noise; rms 1."""
    swell = uniform_filter1d(x ** 2, size=int(window_s * SR)) + 0.14 * np.mean(x ** 2)
    return rms_one(x / swell ** (np.clip(share, 0, 1) / 2))


def in_time(rows):
    """Linear interpolation: table columns as curves over all samples."""
    s, *columns = np.transpose(rows)
    return [np.interp(np.arange(N) / SR, s, c) for c in columns]


def add(out, s, sound):
    """Superposition: mix a short sound in at a time."""
    i = round(s * SR)
    out[..., i:i + sound.shape[-1]] += sound[..., :N - i]


def rms_one(x):
    """Mean-power normalisation: scale to unit rms."""
    return x / np.sqrt(np.mean(x ** 2) + 1e-20)


def from_db(db):
    """Logarithmic level: decibels to amplitude gain."""
    return 10 ** (np.asarray(db) / 20)


def scene():
    """Superposition: airborne sound passes the ports; wind, hum and knocks act on each capsule."""
    rumble, hum = machinery()
    airborne = rumble + splash() + drops_and_gulps() + slaps() + specks()
    return ports(airborne) + hum + winds() + handling()


def record(dry):
    """Transducer noise, band limits and saturation: self-noise, bass roll-off, rounded peaks, steep top cut."""
    # microphone self-noise, mean of the ports in dB: f/Hz, level/dB per Hz
    hiss_spectrum = [(1000, -108), (2500, -113), (5000, -119), (9000, -121), (12000, -123), (16000, -132)]
    cutoff_hz = 15800   # stop-band edge
    hiss = np.array([colour(rng.standard_normal(N), hiss_spectrum) * np.sqrt(SR / 2) for port in range(2)])
    noisy = dry + hiss * from_db([[2.5], [-2.5]])
    x = signal.sosfilt(signal.butter(2, 16, "high", fs=SR, output="sos"), noisy)
    x = x / (1 + np.abs(x / .86) ** 6) ** (1 / 6)
    return signal.sosfilt(signal.cheby2(18, 60, cutoff_hz, fs=SR, output="sos"), x)


dry = scene()
out = record(dry)
put_to_file(out)
```